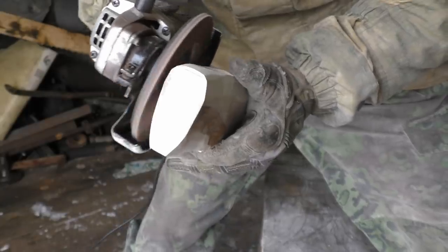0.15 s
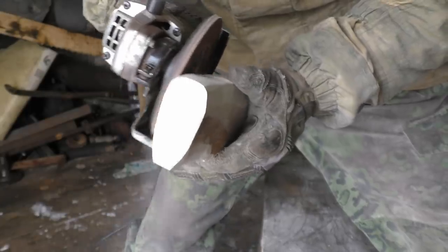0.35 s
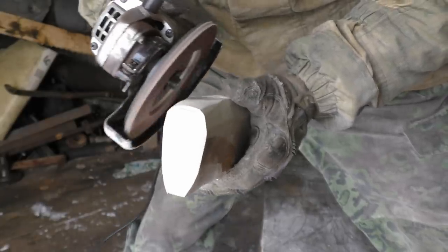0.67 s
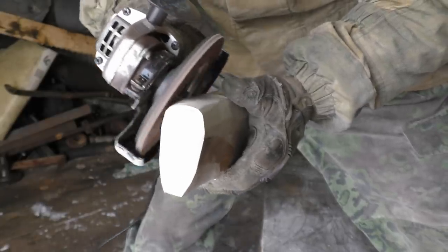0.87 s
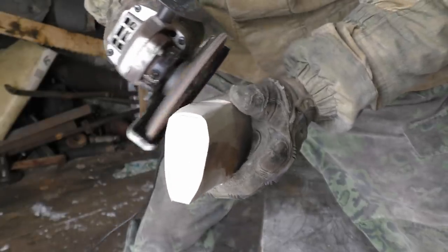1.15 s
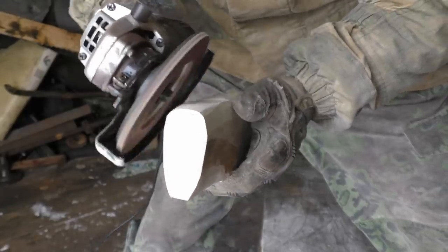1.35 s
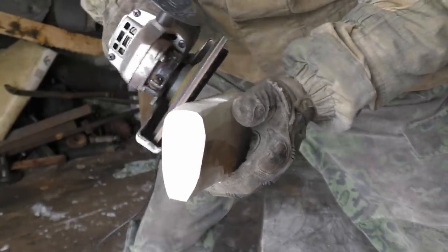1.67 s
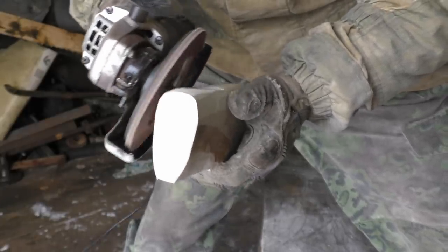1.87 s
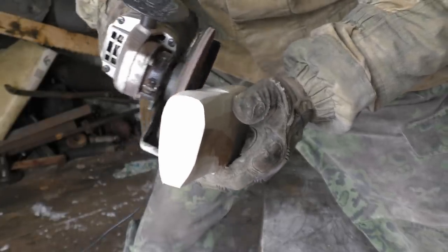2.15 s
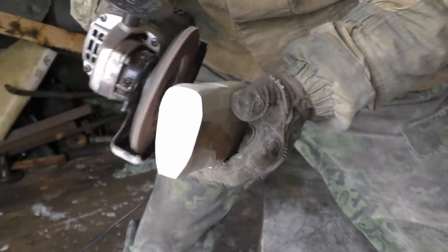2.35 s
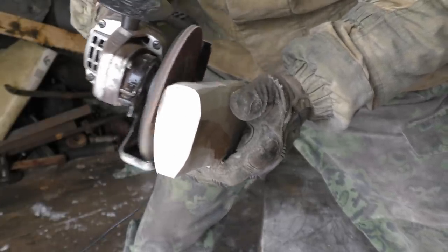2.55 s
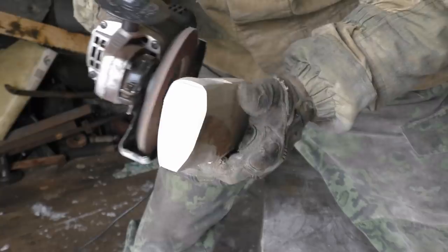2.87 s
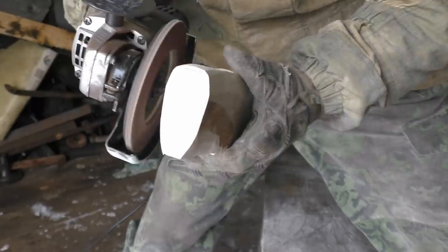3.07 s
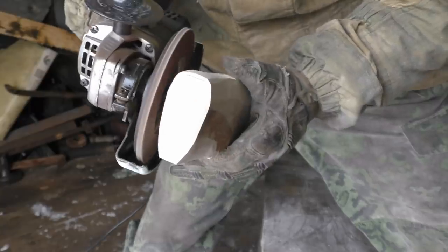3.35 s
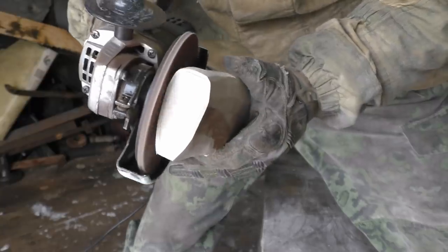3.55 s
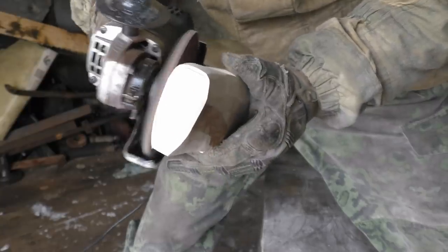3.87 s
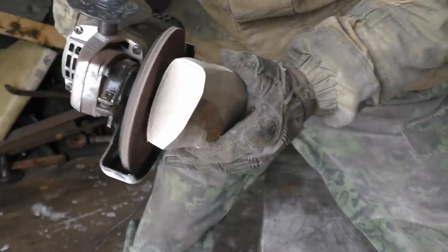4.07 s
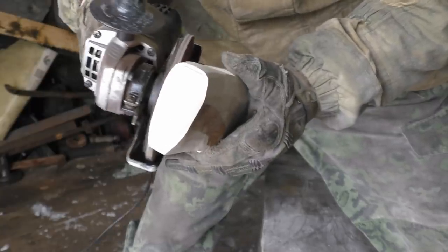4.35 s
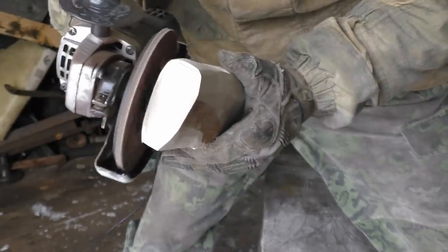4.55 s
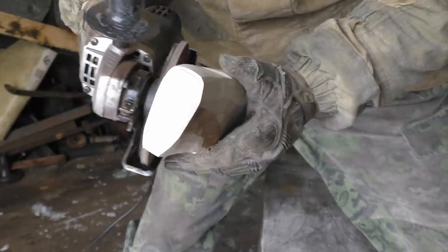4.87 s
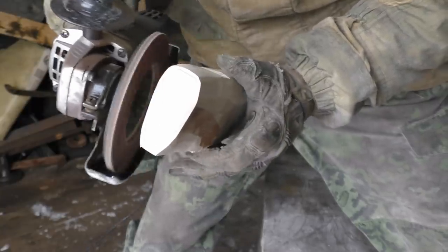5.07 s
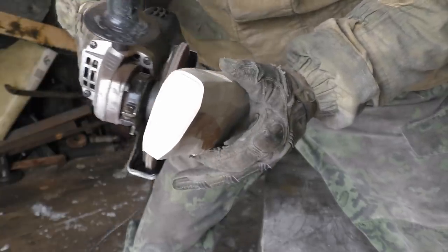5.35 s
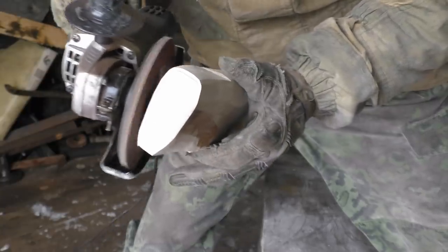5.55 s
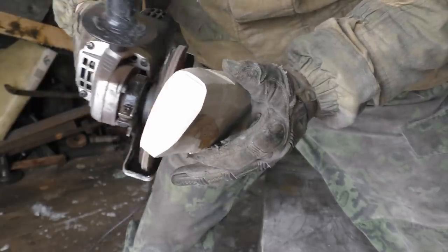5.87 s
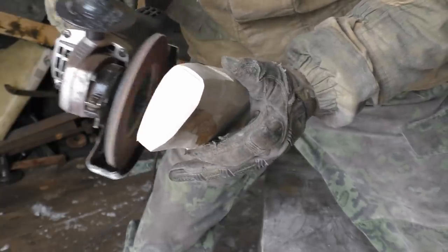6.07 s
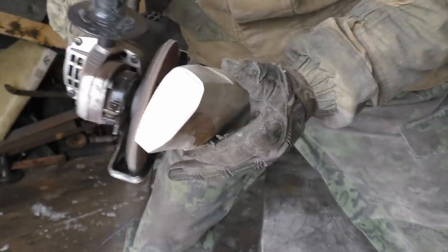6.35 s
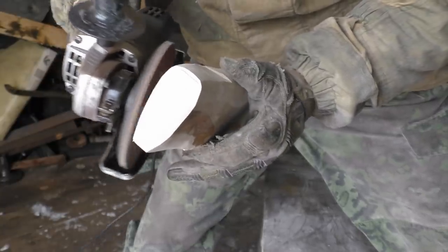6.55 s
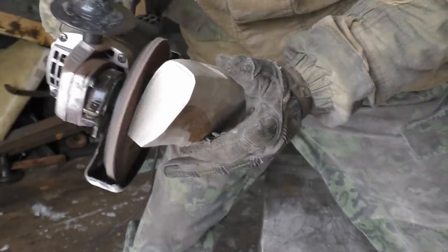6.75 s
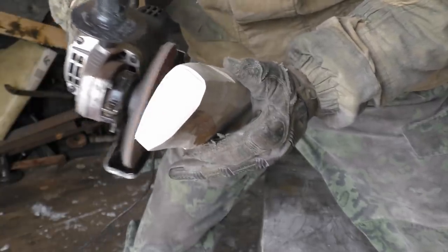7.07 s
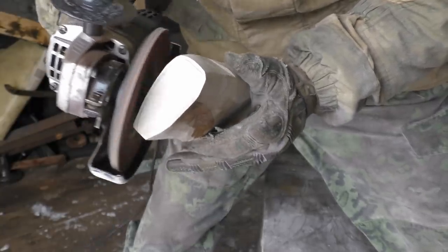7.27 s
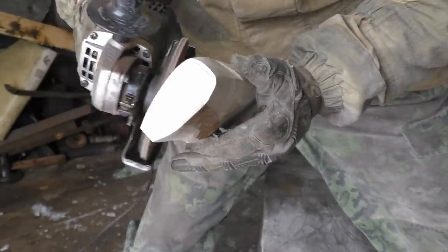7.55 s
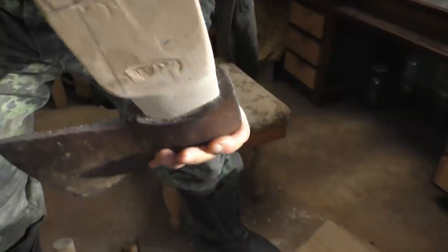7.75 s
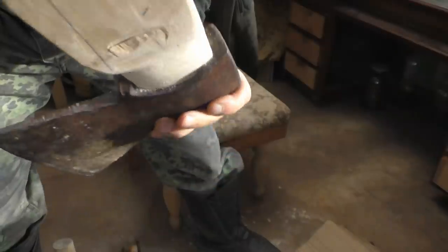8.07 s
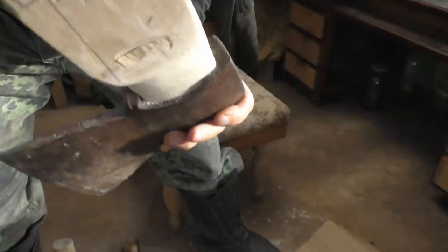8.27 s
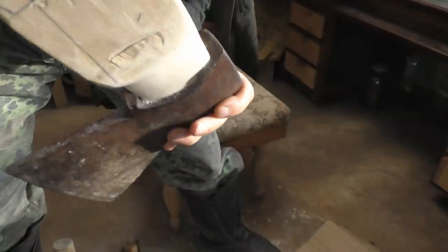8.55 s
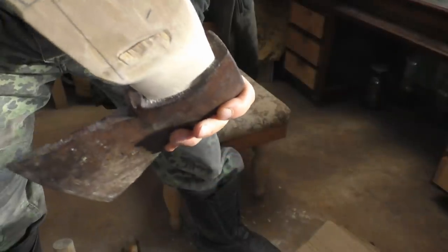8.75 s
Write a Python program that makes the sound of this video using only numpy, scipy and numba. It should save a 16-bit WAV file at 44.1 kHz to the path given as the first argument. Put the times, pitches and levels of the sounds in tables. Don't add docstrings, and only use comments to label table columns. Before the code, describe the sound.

From 0 to about 7.7 seconds an angle grinder runs without stopping, very close to a small camera microphone in a garage. Its fan and brushes make a dense, bright, thin-bassed roar with a steady motor whine inside. A sanding disc is stroked along a wooden handle roughly twice a second, some strokes double; each brief touch adds gritty hiss and a piercing high squeal, sharpest in the first three seconds and duller afterwards. Blown air buffets softly underneath in low puffs. At 0.9 seconds a tiny edit makes the roar blink. At 7.67 it cuts off abruptly to a quiet room: faint hiss and a low machine hum. A sleeve rustles at once, a thumb scuffs at 7.8, a palm rubs the axe handle in short dry strokes from 7.9 to 8.3, lightly again near 8.6, then the sleeve swells at 8.7 with a final tiny scuff.

```python
import sys
import numpy as np
from scipy import signal
from scipy.fft import rfft, irfft, next_fast_len
from scipy.io import wavfile
from scipy.ndimage import uniform_filter1d, map_coordinates
from numba import njit

SR = 44100
rng = np.random.default_rng(int(sys.argv[2]) if len(sys.argv) > 2 else 0)


def generate_wav(sig):
    pcm = np.round(np.clip(np.atleast_2d(sig).T, -1, 1) * 32767).astype(np.int16)
    wavfile.write(sys.argv[1], SR, pcm)


def linear_from_db(decibels):
    return 10 ** (np.asarray(decibels, float) / 20)


N = 392490
T = np.arange(N) / SR

# (break [s], its fade-in [s], change to the quiet garage [s])
EDITS = (.908, .012, 7.668)
# (start [s], end [s])
GRIP_S = (3, 4)
# (start [s], length [s], grit [dB], squeal [dB])
TOUCHES = [(0.0, 0.028, -42, -35), (0.41, 0.037, -35.5, -35), (.452, 0.039, -43, -26.5),
           (0.505, 0.043, -41, -30), (1.022, 0.024, -36, -27), (1.066, 0.061, -42, -28),
           (1.551, 0.022, -38.5, -37), (1.625, 0.14, -40.5, -34), (2.076, 0.079, -41, -43),
           (2.169, 0.028, -37.5, -29.5), (2.207, 0.062, -43, -38), (2.655, 0.055, -40, -49),
           (2.717, 0.03, -38, -33), (2.752, 0.066, -51, -37.5), (3.675, 0.091, -42.5, -49),
           (3.8, 0.035, -43.5, -39), (4.378, 0.022, -50, -44), (4.803, .035, -42, -51),
           (4.839, 0.049, -44, -43.5), (5.37, 0.056, -41.5, -48), (5.427, .055, -48.5, -41),
           (5.775, 0.014, -40.5, -49), (5.864, 0.089, -39, -37.5), (6.43, .095, -40, -40),
           (6.951, 0.1, -40, -36), (7.406, 0.014, -39.5, -39), (7.47, 0.052, -39, -43),
           (7.521, 0.066, -38.5, -30.5)]
BITE_S, LIFT_S = 0.022, 0.025


def set_rms(x, db):
    return x * linear_from_db(db) / np.sqrt(np.mean(x ** 2))


def band_rms(x, lo_hz, hi_hz):
    f = np.arange(N // 2 + 1) * SR / N
    inside = (f > lo_hz) & (f < hi_hz)
    return np.sqrt(2 * np.sum(np.abs(rfft(x)[inside]) ** 2)) / N


def colour(x, points):
    hz, db = np.transpose(points)
    size = next_fast_len(N)
    f = np.arange(size // 2 + 1) * SR / size + 1
    gain = linear_from_db(np.interp(np.log(f), np.log(hz), db))
    return irfft(rfft(x, size) * gain, size)[..., :N]


@njit
def svf(x, hz, width):
    y, b, l = np.empty(len(x)), 0., 0.
    for i in range(len(x)):
        g, k = np.tan(np.pi * hz[i] / SR), width / hz[i]
        v = (b + g * (x[i] - l)) / (1 + g * (g + k))
        b, l, y[i] = 2 * v - b, l + 2 * g * v, k * v
    return y


def resonance(x, hz, width_hz):
    return svf(x, np.full(N, 1. * hz), 1. * width_hz)


def ring(x, modes):
    return sum(linear_from_db(db) * resonance(x, hz, width_hz) for hz, width_hz, db in modes)


def noise():
    return rng.standard_normal(N)


def walk(rate_hz):
    k = int(SR / rate_hz)
    steps = np.repeat(rng.standard_normal(N // k + 1), k)
    return 1.244 * uniform_filter1d(uniform_filter1d(steps, k), k)[:N]


def held(starts, lengths, dbs, rise_s, fall_s):
    s, length, db, rise = (np.reshape(v, (-1, 1)) for v in (starts, lengths, dbs, rise_s))
    attack = np.clip((T - s) / rise, 0, 1)
    release = np.exp(-np.maximum(T - s - length, 0) / fall_s)
    return np.sum(linear_from_db(db) * attack * release, axis=0)


def patchy(x, depth_db, steps, bins):
    z = signal.stft(x, nperseg=512)[2]
    field = rng.standard_normal(z.shape)
    for _ in range(2):
        field = uniform_filter1d(uniform_filter1d(field, steps, axis=1), bins, axis=0)
    return signal.istft(z * linear_from_db(depth_db * field / field.std()), nperseg=512)[1][:N]


def room():
    # (frequency [Hz], density [dB per Hz])
    hiss_points = [(24, -57), (40, -35), (202, -12.5), (294, -12), (342, -10), (387, -16), (450, -14),
                   (523, -22), (905, -10), (1250, -14), (2060, -15), (3390, -20), (15600, -28)]
    # (frequency [Hz], width [Hz], level [dB])
    room_modes = [(880, 150, 0), (1470, 72, 6.5), (1720, 65, 11.5), (2590, 520, 8)]
    # (multiple of hum_hz, level [dB])
    hum_orders = [(2, -83), (4, -82), (5, -77), (6, -74), (8, -70.5), (9, -71.5), (10, -83)]
    hum_hz = 48.5
    hiss = colour(noise(), hiss_points)
    hiss = set_rms(hiss + linear_from_db(-1.5) * ring(hiss, room_modes), -55.5)
    hum = sum(linear_from_db(db + 3 + 2.9 * walk(13)) * np.sin(2 * np.pi * k * hum_hz * T + k * k) for k, db in hum_orders)
    return hiss + hum


def palm():
    # (start [s], length [s], low modes [dB], high modes [dB])
    rubs = [
        (7.922, .1, -58, -58),
        (8.026, 0.093, -56, -56),
        (8.135, 0.073, -57, -58),
        (8.22, .12, -71, -72),
        (8.58, .11, -65, -68),
    ]
    # (frequency [Hz], width [Hz], level [dB])
    low_modes = [(980, 150, -16), (1704, 24, 3.5), (2250, 51, -11), (3300, 150, -14)]
    # (frequency [Hz], width [Hz], level [dB])
    high_modes = [(4630, 140, 6), (4900, 180, -17), (6900, 150, -14), (7810, 200, -12)]
    rise_s, fall_s = 0.012, 0.013
    start, span, low_db, high_db = np.transpose(rubs)
    skin = noise() * linear_from_db(2.4 * walk(70))
    low, high = ring(skin, low_modes), ring(skin, high_modes)
    low = low / band_rms(low, 1640, 1800)
    high = high / band_rms(high, 4500, 4850)
    return (held(start, span, low_db + 2.0, rise_s, fall_s) * low
            + held(start, span, high_db - 0.6, rise_s, fall_s) * high)


def thumb():
    # (time [s], length [s], level [dB])
    scuffs = [
        (7.832, 0.034, -48),
        (8.19, 0.034, -57),
        (8.797, 0.018, -62),
    ]
    # (frequency [Hz], width [Hz], level [dB])
    scuff_modes = [(2310, 54, 2), (3320, 100, -6), (4740, 150, -3), (6860, 3000, -18)]
    slips = sum(linear_from_db(db) * np.exp(-(2 * (T - s) / length) ** 4) for s, length, db in scuffs)
    return slips * set_rms(ring(noise(), scuff_modes), 0)


def sleeve():
    # (start [s], length [s], rise [s], level [dB])
    shifts = [
        (7.712, 0.064, 0.014, -48),
        (8.714, 0.092, .08, -48.5),
        (8.85, .02, .01, -57),
    ]
    # (frequency [Hz], density [dB per Hz])
    cloth_points = [(1500, -9), (2400, 0), (3600, -1.5), (5500, -2), (7000, -13), (15000, -20)]
    # (frequency [Hz], width [Hz], level [dB])
    cloth_modes = [(2560, 100, 0), (3620, 46, 6), (4440, 100, 2), (4840, 400, -5), (5760, 400, -5)]
    start, hold, rise_s, cloth_db = np.transpose(shifts)
    cloth = colour(noise() * linear_from_db(1.6 * walk(300)), cloth_points)
    cloth = cloth + linear_from_db(4) * ring(cloth, cloth_modes)
    return held(start, hold, cloth_db - 3.0, rise_s, 0.029) * cloth / band_rms(cloth, 2900, 6500)


def leaning():
    s, length, _, _ = np.transpose(TOUCHES)
    k = int(0.072 * SR)
    touch = np.minimum(held(s, length, 0 * s, BITE_S, LIFT_S), 1)
    return uniform_filter1d(uniform_filter1d(touch, k), k)


def buffet(lean):
    # (first level [dB], last level [dB])
    air_ends_db = [-65, -61]
    air_db = np.interp(T, [0, EDITS[2]], air_ends_db) - 6.5 * lean + 3 * walk(12)
    low = colour(noise(), [(30, 2), (300, -10.0), (335, 0.5), (500, -1.5), (600, -26.0), (800, -74)])
    return linear_from_db(air_db) * low / band_rms(low, 345, 520)


def low_swells(lean, length_s=0.044, count=60):
    # (time [s], lowest pitch [Hz], level [dB])
    deep_swells = [(.348, 223, -65), (.92, 134, -63), (1.048, 293, -59), (1.184, 175, -66), (1.47, 212, -64),
                   (1.841, 220, -71), (2.049, 167, -67), (2.093, 323, -61), (2.49, 187, -68), (2.61, 186, -62),
                   (3.1, 223, -71), (3.58, 152, -70), (3.654, 248, -66), (3.959, 252, -66), (4.101, 202, -69),
                   (5.05, 152, -68), (5.108, 163.2, -64), (5.2, 145, -65), (5.34, 146, -60), (5.581, 256, -57.5),
                   (5.779, 155, -65), (6.225, 165, -66), (6.327, 238, -60), (6.426, 224, -66), (6.66, 224, -66),
                   (7.12, 200, -64), (7.288, 125, -63), (7.32, 166, -57), (7.355, 150, -57), (7.45, 130, -65)]
    step, top_hz, scatter_s = 1.42, 360, 0.013
    out, size = np.zeros((2, N)), int(length_s * SR)
    t = np.arange(size) / SR
    deep = [(s, hz * step ** k, db) for s, hz, db in deep_swells for k in range(3)
            if k == 0 or hz * step ** k < top_hz]
    when, pitch, force = rng.random((count, 3)).T
    when = 0.1 + 7.4 * (np.arange(count) + when) / count
    shallow_db = -62.5 - 8 * force - 30 * lean[(when * SR).astype(int)]
    swells = deep + list(zip(when, 312 * (0.906 + 0.15 * pitch), shallow_db))
    for (s, hz, db), (turn, side, twist, late) in zip(swells, rng.standard_normal((len(swells), 4))):
        i = int((s + scatter_s * late) * SR) - size // 2
        for c, sign in enumerate((1, -1)):
            gain = linear_from_db(db + 6.5 + 1.7 * sign * side)
            phase = 2 * np.pi * hz * t + 9 * turn + 0.5 * sign * twist
            out[c, i:i + size] += gain * np.hanning(size) * np.sin(phase)
    return out


def disc(shaft):
    # (frequency [Hz], density [dB per Hz])
    grit_points = [(2500, -29), (5000, -5.5), (8000, -0.5), (11000, 1), (13000, -4.5), (15700, -4)]
    # (frequency [Hz], width [Hz], level [dB])
    near_modes = [(12200, 90, -3), (11550, 140, -1.5), (10870, 270, -5)]
    free_grit_db, free_squeal_db = -45, -59
    gear, ring_s = 3.72, 0.02
    s, length, grit_db, squeal_db = np.transpose(TOUCHES)
    tear = np.hypot(linear_from_db(free_grit_db), held(s, length, grit_db, BITE_S, LIFT_S))
    sing = linear_from_db(free_squeal_db) + held(s, length, squeal_db, 0.37 * BITE_S, ring_s) * linear_from_db(2.2 * walk(40))
    squeal_hz = 11930 * (1 + 0.005 * walk(14))
    turn = np.cos(shaft / gear)
    grit = colour(noise() * linear_from_db(1.0 * walk(900)) * (1 + 0.078 * turn), grit_points)
    grit = patchy(grit / band_rms(grit, 12270, 15970), 0.91, steps=8, bins=6)
    core = set_rms(svf(svf(noise(), squeal_hz, 55.), squeal_hz, 250.), -2.7) * (1 + 0.3 * turn)
    skirt = set_rms(svf(noise(), squeal_hz, 900.), -5.5)
    skirt = skirt + set_rms(ring(noise(), near_modes) * linear_from_db(3 * walk(30)), -7.5)
    return tear * grit + sing * (core + skirt)


def housing_roar():
    # (frequency [Hz], density [dB per Hz])
    roar_points = [(180, -52), (300, -12), (469, -19.5), (663, -19), (922, -15), (1140, -3), (1730, -8),
                   (2290, 0), (4290, -4), (4890, -5), (5580, -7), (6590, -5.5), (9170, -13.5), (10800, -14),
                   (15600, -34)]
    # (frequency [Hz], width [Hz], level [dB])
    housing_modes = [(1318, 71, -2), (2650, 130, -12.5), (3830, 520, -7.5), (6000, 430, -2),
                     (10170, 350, 1.5)]
    roar = colour(noise() * linear_from_db(0.54 * walk(250)), roar_points)
    roar = roar + linear_from_db(-3) * ring(roar, housing_modes)
    roar = roar - 0.3 * resonance(roar, 5700, 350)
    shade = np.interp(T, [1, 2.5], [0.3, 0.6])
    roar = roar - shade * svf(roar, 9150 * (1 + 0.01 * walk(3)), 900.)
    return patchy(roar / band_rms(roar, 2150, 3840), 0.67, steps=8, bins=3)


def shaft_whine(shaft):
    # (shaft multiple, level [dB])
    orders = [(2, -47), (4, -59), (5, -40.5), (6, -44.5), (12, -43.5)]
    whine = np.zeros(N)
    for k, db in orders:
        order_db = db + 2.5 * np.minimum(walk(40), 1.2) - k * np.interp(T, GRIP_S, [0, 0.35])
        whine += linear_from_db(order_db) * np.sin(k * shaft + k + 0.054 * k * walk(150))
    return whine


def motor(shaft, lean):
    # (time [s], roar [dB], vent towards the microphone [dB])
    running = [(0, -33.5, -3), (.5, -34.5, 1.5), (1.25, -34, -1.5), (1.65, -32, 0.5), (1.9, -33.5, 5),
               (2.4, -34, -1), (2.9, -34, 1.5), (3.25, -33.5, 4), (3.7, -32.5, -2.5), (4.3, -33, 1),
               (4.8, -32.5, -2.5), (5.4, -32, -1), (6, -32.5, -3), (6.5, -32.6, -3), (7.1, -32.5, -1.5),
               (7.5, -30.5, -6), (7.66, -34, -7)]
    time_s, roar_db, facing_db = np.transpose(running)
    roar_db = np.interp(T, time_s, roar_db) - lean + 0.36 * walk(9)
    vent_db = -4.5 + 0.5 * np.interp(T, time_s, facing_db) - 0.2 * lean + 1.2 * walk(7)
    guard_db = -3 - 6 * lean + 1.9 * walk(5.5)
    vent_hz = 4930 * (1 + 0.016 * lean + 0.014 * walk(8))
    vent = svf(svf(noise(), vent_hz, 460.), vent_hz, 340.)
    vent = linear_from_db(1.9 * (vent_db + 7)) * set_rms(vent, -9)
    guard = resonance(resonance(noise(), 2380, 500), 2380, 500)
    guard = linear_from_db(2.6 * (guard_db + 2)) * set_rms(guard, -12.5)
    return linear_from_db(roar_db) * (housing_roar() + vent + guard) + shaft_whine(shaft)


def mirrored(x, echo_db, lean):
    # (before the grip changes [ms], after [ms])
    lean_ms = [-0.032, -0.094]
    lag_ms = 0.93 + np.interp(T, GRIP_S, lean_ms) * lean
    echo = map_coordinates(x, [np.arange(N) - lag_ms * SR / 1000], order=3)
    treble = signal.butter(2, [2600, 11500], "band", fs=SR, output="sos")
    return x + linear_from_db(echo_db) * signal.sosfiltfilt(treble, echo)


def ports(x, width, spread_s):
    echo = rng.standard_normal(2048) * np.exp(-np.arange(2048) / SR / spread_s)
    side = colour(signal.fftconvolve(x, echo / np.linalg.norm(echo))[:N], width)
    return np.array([x + side, x - side])


def starve(x, floor_db, top_hz, luck_db):
    f, _, z = signal.stft(x, SR, window="cosine", nperseg=2048)
    loud = np.sqrt(np.mean(np.abs(z[:, f > 8000]) ** 2, axis=1, keepdims=True))
    cell = uniform_filter1d(np.abs(z), size=3, axis=1)
    luck = uniform_filter1d(rng.standard_normal(z.shape[1:]), size=3, axis=0)
    masked = (cell < linear_from_db(floor_db + luck_db * luck) * loud ** 0.7) & (f[:, None] < top_hz)
    weak = masked | (f[:, None] < 345 + 120 * luck[:1])
    return signal.istft(np.where(weak, linear_from_db(-38) * z, z), SR, window="cosine", nperseg=2048)[1][:, :N]


def scene():
    # (frequency [Hz], side minus mid [dB])
    tool_width = [(60, -6), (110, 2), (200, -10.5), (380, -13), (700, -15.5), (1290, -21), (2380, -19),
                  (4400, -15), (8120, -6), (15000, -4)]
    # (frequency [Hz], side minus mid [dB])
    quiet_width = [(60, -11), (110, -13), (200, -12), (380, -12), (700, -18), (1290, -10), (2380, -11),
                   (4400, -7), (8120, 0), (15000, 2)]
    # (frequency [Hz], left minus right [dB])
    tilt = [(60, 1.5), (110, -10), (200, -6), (380, 0.5), (700, -0.5), (1290, 0), (2380, 0.5), (4400, -1),
            (8120, -2.5), (15000, 4.5)]
    short_s, fade_s, last_s = EDITS
    lean = leaning()
    shaft = 2 * np.pi * np.cumsum(561 * (1 + 0.00555 * walk(25))) / SR
    grinder = mirrored(motor(shaft, lean), np.interp(T, GRIP_S, [-15, -11.5]), lean)
    grinder = colour(grinder, [(250, -80), (430, -32), (520, 0), (16000, -1)])
    left, right = ports(grinder + disc(shaft) + buffet(lean), tool_width, 0.02)
    left = colour(left, [(f, db / 2) for f, db in tilt])
    right = colour(right, [(f, -db / 2) for f, db in tilt])
    tool = starve(np.array([left, right]), -34.5, 950, 6.5)
    gate = np.where(T < short_s, 1, np.clip((T - short_s) / fade_s + 0.049, 0, 1))
    running = np.clip((last_s - T) / 0.003, 0, 1)
    quiet = ports(room() + palm() + thumb() + sleeve(), quiet_width, 0.011)
    return running * (tool * gate + low_swells(lean)) + (1 - running) * quiet


def roll_off(x):
    return signal.sosfilt(signal.butter(12, 15700, fs=SR, output="sos"), x)


def record(dry):
    return roll_off(dry)


dry = scene()
out = record(dry)
generate_wav(out)
```